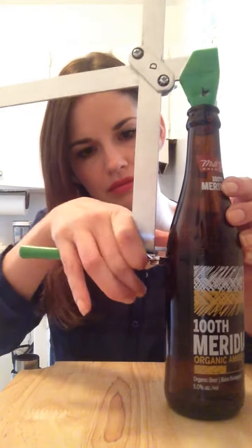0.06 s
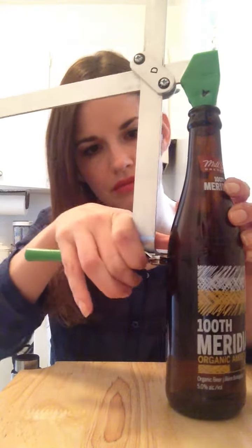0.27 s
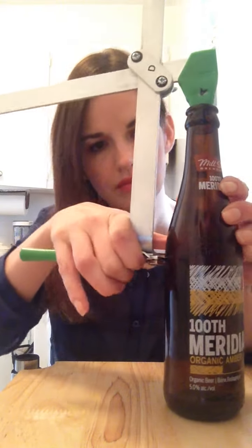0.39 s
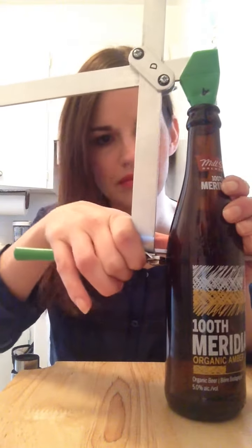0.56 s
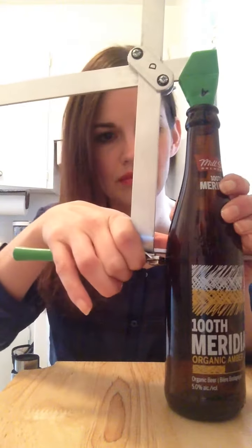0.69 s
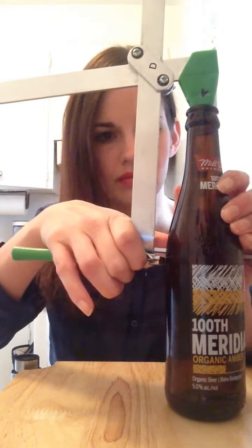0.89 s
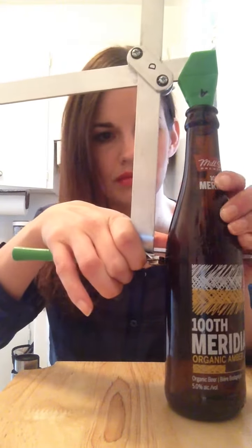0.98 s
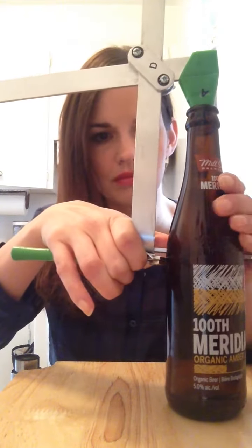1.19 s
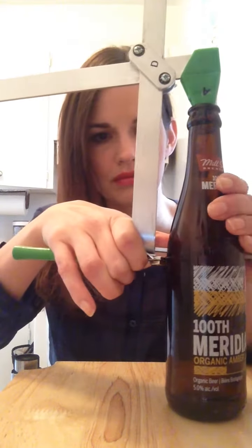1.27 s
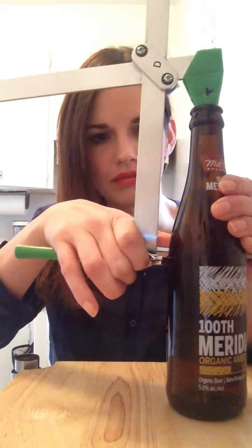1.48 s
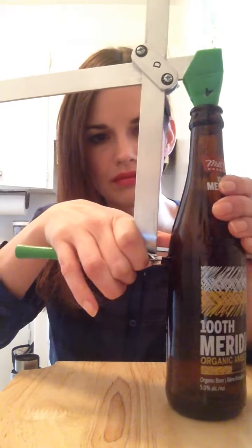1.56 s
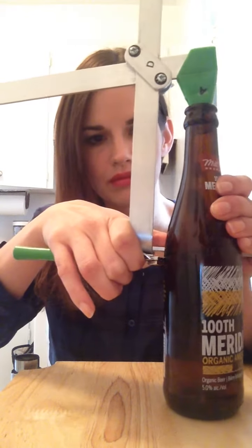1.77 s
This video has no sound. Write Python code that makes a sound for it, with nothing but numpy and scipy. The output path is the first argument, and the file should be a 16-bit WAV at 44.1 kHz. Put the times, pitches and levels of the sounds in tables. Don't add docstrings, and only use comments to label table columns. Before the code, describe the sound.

Close up in a small kitchen, a faint creak leads into one loud, bright clack of a cutter frame on glass with a dull table knock, then faint finger rustles and finally irregular brittle scoring ticks over motor hum.

```python
import sys
import numpy as np
from scipy import signal
from scipy.io import wavfile

SR = 44100
rng = np.random.default_rng(int(sys.argv[2]) if len(sys.argv) > 2 else 0)


def digitize_waveform(pressure):
    field = np.atleast_2d(pressure).T
    bounded = np.clip(field, -1, 1)
    quanta = np.round(bounded * 32767).astype(np.int16)
    wavfile.write(sys.argv[1], SR, quanta)


def voltage_ratio(decibels):
    exponent = np.asarray(decibels, float) / 20
    return 10 ** exponent


N = 79380

# pitch_hz, level_db, t60_s
BOTTLE_MODES = [(3950, 0.5, 0.061), (4740, -18, .04), (5600, -18.5, .03), (6845, -20, .04), (7827, -6, .04),
                (7970, -12, .07), (8910, -19, .05), (9910, -4, 0.018), (10250, -1, .02), (12700, -27, .04),
                (13700, -22.5, 0.045), (14100, -13, .03), (15040, -3.5, 0.014)]
# pitch_hz, level_db, t60_s
FRAME_MODES = [(520, -22, 0.094), (620, -21.5, 0.055), (1159.6, -22, .012), (1900, -14.5, .006),
               (2280, -24, .03), (3016, -22.5, .03), (4695, -15, 0.026), (3960, 0, 0.028),
               (3798, -18.5, .09), (4160, -12, .025), (7957, -12, 0.045), (10040, -14.5, .08),
               (10210, -16, .07), (8900, -21.5, .05)]
# pitch_hz, level_db, t60_s
CREAK_MODES = [(3620, 1, .03), (3100, -14.5, .02), (3900, -6, .03)]
# pitch_hz, level_db, t60_s
TABLE_MODES = [(75, -13.5, 0.13), (130, -7.5, 0.15), (298, -8, .1), (500, 0.5, 0.043), (620, 1.5, .05),
               (815, -4.5, .04)]
# start_s, level_db
CREAKS = [
    (.2345, -49.5),
    (.2385, -50),
    (.242, -44.5),
    (0.243, -39.5),
    (0.245, -36),
]
# start_s, level_db
KNOCKS = [
    (.224, -47),
    (.2496, -43.5),
    (.273, -38.5),
]
# start_s, level_db (peak)
BITES = [(.2224, -45), (.227, -40), (1.366, -57), (1.3907, -56.5), (1.5499, -31.5), (1.5871, -32),
         (1.615, -47), (1.632, -52), (1.667, -50.5), (1.6829, -37), (1.7164, -31.5), (1.724, -30.5),
         (1.7474, -27.5), (1.779, -44.5), (1.7978, -44)]
# start_s, length_s, level_db
ROLLS = [
    (0.027, .07, -82.5),
    (.205, .045, -65),
    (1.355, .075, -87),
    (1.55, .25, -74.5),
]
# start_s, length_s, level_db, centre_hz
BRUSHES = [
    (.001, 0.0079, -72, 9000),
    (.066, 0.0064, -70.5, 10500),
    (0.502, .018, -74.5, 10080),
    (.508, 0.0056, -65.5, 5100),
    (.96, .07, -78, 11500),
    (1.124, 0.006, -66.5, 4960),
    (1.128, 0.023, -80, 10000),
    (1.365, .004, -78, 9000),
    (1.388, 0.0043, -67.5, 11000),
    (1.42, .006, -73, 10500),
]
# centre_hz, width_hz
CLOSE_DIPS = [(6350, 430), (11500, 740)]
# pitch_hz, width_hz, level_db
HUM_RESONANCES = [(92, 18, -67.5), (151, 12, -59), (177.3, 14, -57.5), (200, 12, -61), (278.2, 12, -63.5),
                  (301.2, 10, -64.5), (355, 9, -68), (444.8, 22, -65.5), (475.8, 22, -69), (580, 50, -71.5),
                  (828, 40, -75.5), (925, 44, -74)]
# pitch_hz, density_db (per Hz)
AIR_SPECTRUM = [(30, -16.5), (90, -4), (300, -5.5), (700, -8), (1500, -17), (3000, -29.5), (5500, -37.5),
                (15000, -41)]

CLACK_S, CLACK_BOTTLE_DB, CLACK_FRAME_DB = .2494, -18, -9.5
CLACK_CRACK_DB, CLACK_CRACK_S = -19.5, .0017
REBOUND_S, REBOUND_DB = .0024, -10.5
BITE_RING_DB, BITE_SPREAD_DB, BITE_CRACK_DB, BITE_CRACK_S = -13.5, 1.5, -13.5, .003
GRIT_PER_S, GRIT_SPREAD_DB, GRIT_HISS_DB = 900, 4, -1.5
BRUSH_EDGE_S = .0015
ROOM_DB, ROOM_LOW_T60_S, ROOM_HIGH_T60_S, ROOM_GAP_S = -13.5, .27, .2, .005
MOTOR_HZ, MOTOR_WANDER_HZ, MOTOR_DB, MOTOR_WAVER_DB = 174.3, 2.2, -54, 1.5
AIR_DB, AIR_PATCHY_DB = -62.5, .9
DUCK_DB, DUCK_ATTACK_S, DUCK_RECOVER_S = -3, .071, .27
MIC_LOW_HZ, MIC_TOP_HZ = 42, 15600


def band(x, low_hz, high_hz):
    return signal.sosfilt(signal.butter(2, [low_hz, min(high_hz, .45 * SR)], "band", fs=SR, output="sos"), x)


def above(x, hz):
    return signal.sosfilt(signal.butter(2, hz, "high", fs=SR, output="sos"), x)


def rms_one(x):
    return x / np.sqrt(np.mean(x ** 2) + 1e-20)


def drift(rate_hz):
    r = np.exp(-2 * np.pi * rate_hz / SR)
    wander = signal.lfilter([1], [1, -2 * r, r * r], rng.standard_normal(N + SR))
    return rms_one(wander[SR:])


def span(start_s, length_s, edge_s):
    t = np.arange(N) / SR
    inside = np.minimum(t - start_s, start_s + length_s - t)
    return np.clip(inside / edge_s, 0, 1)


def sample_at(times_s):
    return np.minimum(np.asarray(times_s) * SR, N - 1).astype(int)


def ring(clicks, hz, t60_s):
    r = voltage_ratio(-60 / (t60_s * SR))
    w = 2 * np.pi * hz / SR
    return signal.lfilter([0, np.sin(w)], [1, -2 * r * np.cos(w), r * r], clicks + 1e-18)


def strike(modes, times_s, levels_db, spread_db):
    out, at = np.zeros(N), sample_at(times_s)
    luck = rng.standard_normal((len(at), len(modes)))
    for k, (hz, db, t60_s) in enumerate(modes):
        clicks = np.zeros(N)
        clicks[at] = voltage_ratio(levels_db + db + spread_db * luck[:, k])
        clicks *= (-1) ** (hz // 3000)
        out += ring(clicks, hz, t60_s)
    return out


def crack(times_s, levels_db, decay_s, low_hz, high_hz):
    clicks = np.zeros(N)
    clicks[sample_at(times_s)] = voltage_ratio(levels_db)
    envelope = signal.lfilter([1], [1, -np.exp(-1 / (decay_s * SR))], clicks)
    return envelope * rms_one(band(rng.standard_normal(N), low_hz, high_hz))


def clack():
    hit_s = np.array([CLACK_S, CLACK_S + REBOUND_S])
    hit_db = np.array([0, REBOUND_DB])
    snap = strike(BOTTLE_MODES, hit_s, hit_db + CLACK_BOTTLE_DB, 0)
    snap += strike(FRAME_MODES, hit_s, hit_db + CLACK_FRAME_DB, 0)
    contact = crack(hit_s, hit_db + CLACK_CRACK_DB, CLACK_CRACK_S, low_hz=600, high_hz=9000)
    creak_s, creak_db = np.transpose(CREAKS)
    creaks = strike(CREAK_MODES, creak_s, creak_db, 3.0)
    knock_s, knock_db = np.transpose(KNOCKS)
    knocks = strike(TABLE_MODES, knock_s, knock_db, 1.5)
    return above(snap, hz=440) + contact + above(creaks, hz=2770) + knocks


def bites():
    start_s, db = np.transpose(BITES)
    rings = strike(BOTTLE_MODES, start_s, db + BITE_RING_DB, BITE_SPREAD_DB)
    return rings + crack(start_s, db + BITE_CRACK_DB, BITE_CRACK_S, low_hz=5600, high_hz=15910)


def bottle_ring(clicks):
    return sum(voltage_ratio(db) * ring(clicks, hz, t60_s) for hz, db, t60_s in BOTTLE_MODES)


def grit():
    sizes = voltage_ratio(GRIT_SPREAD_DB * np.minimum(rng.exponential(1, N), 4)) * rng.choice([-1, 1], N)
    grains = sizes * (rng.random(N) < GRIT_PER_S / SR)
    level = sum(voltage_ratio(db) * span(start_s, length_s, .01) for start_s, length_s, db in ROLLS)
    level = level * voltage_ratio(3 * drift(25))
    rings = bottle_ring(grains * level) / np.std(bottle_ring(grains))
    hiss = level * rms_one(band(rng.standard_normal(N), 4500, 14000))
    return rings + voltage_ratio(GRIT_HISS_DB) * hiss


def fingers():
    rough = rng.standard_normal(N) * voltage_ratio(1.1 * drift(150))
    out = np.zeros(N)
    for start_s, length_s, db, hz in BRUSHES:
        rustle = rms_one(band(rough, .6 * hz, 1.6 * hz))
        out += voltage_ratio(db) * span(start_s, length_s, BRUSH_EDGE_S) * rustle
    return out


def room(x):
    t = np.arange(SR // 2) / SR
    white = rng.standard_normal((2, len(t)))
    low = band(white[0], 220, 5000) * voltage_ratio(-60 * t / ROOM_LOW_T60_S)
    high = band(white[1], 5000, 16000) * voltage_ratio(-60 * t / ROOM_HIGH_T60_S)
    tail = (low + high) * (t > ROOM_GAP_S)
    return voltage_ratio(ROOM_DB) * signal.fftconvolve(x, tail / np.sqrt(np.sum(tail ** 2)))[:N]


def hum():
    pitch_hz = MOTOR_HZ + MOTOR_WANDER_HZ * drift(2.5)
    tone = np.sin(2 * np.pi * np.cumsum(pitch_hz) / SR)
    rumble = np.zeros(N)
    for hz, width_hz, db in HUM_RESONANCES:
        t60_s = 1.1 / width_hz
        once = ring(rng.standard_normal(N + SR), hz, t60_s)
        rumble += voltage_ratio(db) * rms_one(ring(once, hz, t60_s)[SR:])
    return voltage_ratio(MOTOR_DB + 3.5 + MOTOR_WAVER_DB * drift(4)) * tone + rumble


def air():
    edges_hz = 20 * 2 ** np.arange(0, 10, .5)
    hz, db = np.transpose(AIR_SPECTRUM)
    white = rng.standard_normal((2, N + SR // 2))
    out = np.zeros(N)
    for k, (low, high) in enumerate(zip(edges_hz, edges_hz[1:])):
        band_db = np.interp(np.log(low * high) / 2, np.log(hz), db)
        out += voltage_ratio(band_db + AIR_PATCHY_DB * drift(8)) * band(white[k % 2], low, high)[-N:]
    return voltage_ratio(AIR_DB) * rms_one(out)


def scene():
    close = clack() + above(bites() + grit(), hz=3000) + fingers()
    for hz, width_hz in CLOSE_DIPS:
        b, a = signal.iirnotch(hz, hz / width_hz, fs=SR)
        close = signal.lfilter(b, a, close)
    return (close + room(close) + hum() + air())[None]


def low_pass(x):
    return signal.sosfilt(signal.butter(12, 16970, fs=SR, output="sos"), x)


def record(dry):
    since_s = np.arange(N) / SR - CLACK_S
    dip = np.clip(since_s / DUCK_ATTACK_S, 0, 1) * np.exp(-np.maximum(since_s, 0) / DUCK_RECOVER_S)
    gain = voltage_ratio(DUCK_DB * dip)
    top_cut = signal.cheby2(10, 20, MIC_TOP_HZ, fs=SR, output="sos")
    mix = above(signal.sosfilt(top_cut, dry * gain), MIC_LOW_HZ)
    return low_pass(mix)


dry = scene()
out = record(dry)
digitize_waveform(out)
```